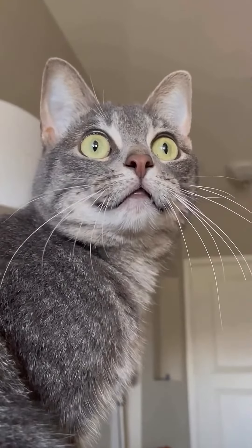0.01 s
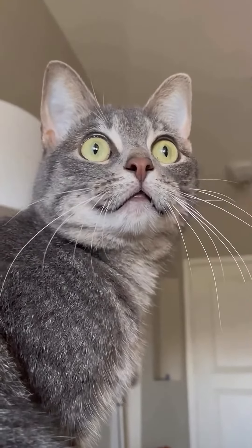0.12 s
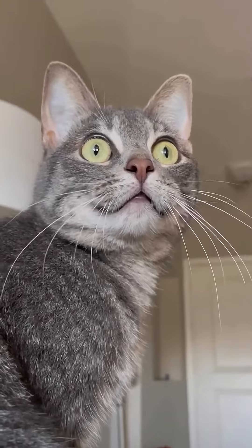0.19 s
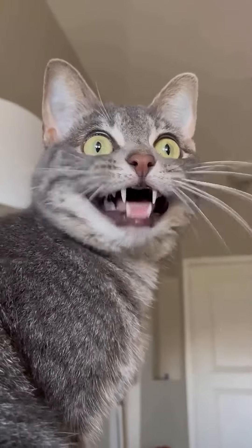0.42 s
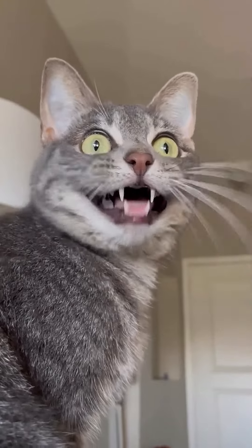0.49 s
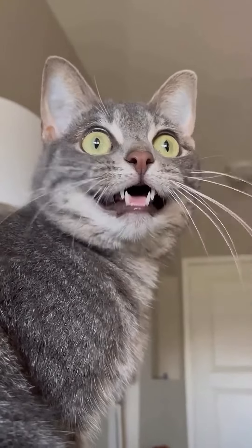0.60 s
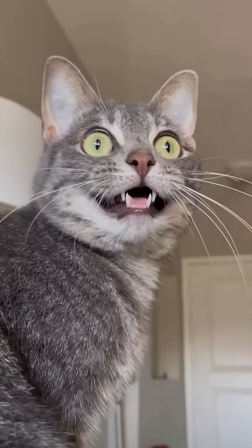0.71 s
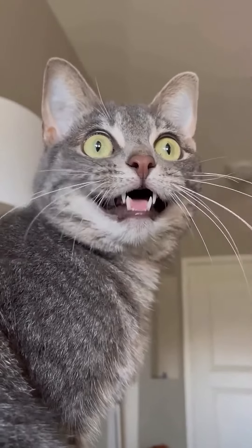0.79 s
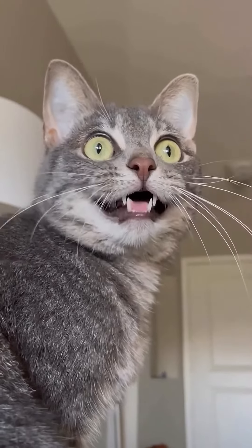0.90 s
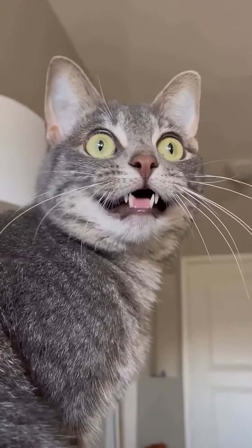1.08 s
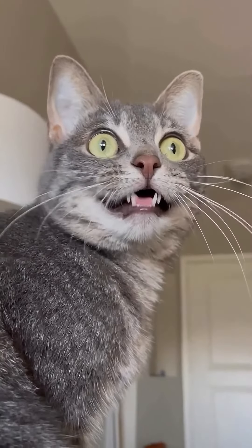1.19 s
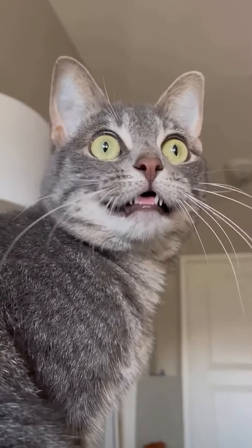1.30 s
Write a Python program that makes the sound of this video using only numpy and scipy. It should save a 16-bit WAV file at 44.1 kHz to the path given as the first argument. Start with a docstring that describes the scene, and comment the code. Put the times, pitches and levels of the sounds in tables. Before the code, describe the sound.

A cat chatters close to the microphone in a small room with low rumble, mains hum and faint hiss. At about 0.2 s it gives one clear, bright chirp under a tenth of a second long, with raspy breath and a blurred echo fading after. Faint lip ticks at 0.82-0.91 s lead to a sharp, voiceless jaw smack near 0.95 s, with wet hiss, tiny whistle and soft echo, then quieter room hum until 1.4 s.

```python
"""A low room rumble with a mains hum comes first, with faint hiss; it sinks unevenly under the cat.
Close to the microphone in a small room, the cat gives one short, clear chirp, a stack of overtones
shaped by throat and mouth, with raspy air and a low, blurred echo of filtered noise. Then come tiny lip
ticks and a voiceless smack of the jaw, coloured impulses with very bright edges, a wet hiss, a brief
whistle and a soft, blurred echo."""
import sys
import numpy as np
from scipy import signal
from scipy.fft import rfft, irfft, next_fast_len
from scipy.io import wavfile
from scipy.ndimage import map_coordinates

SR = 44100
rng = np.random.default_rng(int(sys.argv[2]) if len(sys.argv) > 2 else 0)


def dump_mix(stems):
    """Bounce the given channels to the path in sys.argv[1] as a 16-bit WAV at rate SR."""
    frames = np.atleast_2d(stems).T  # one column per channel
    limited = np.clip(frames, -1, 1)  # hard clip at full scale
    pcm = np.round(limited * 32767).astype(np.int16)
    wavfile.write(sys.argv[1], SR, pcm)


N = 61740  # samples, 1.4 s


def amp(db):
    """Decibels to gain."""
    return 10 ** (np.asarray(db) / 20)


def unit(x):
    """Scale to rms 1."""
    return x / np.sqrt(np.mean(x ** 2) + 1e-20)


def clock():
    """Time of each sample, in seconds."""
    return np.arange(N) / SR


def along(points, hz):
    """Read (f/Hz, value) points at hz, joined along a log frequency axis."""
    f, v = np.transpose(points)
    return np.interp(np.log(hz + 1), np.log(f + 1), v)


def curve(rows, outside=None):
    """(t/s, value) points joined by straight lines."""
    return np.interp(clock(), *np.transpose(rows), left=outside, right=outside)


def wobble(rate):
    """A smooth random curve, rate knots a second."""
    knots = rng.standard_normal(4096)
    return map_coordinates(knots, [clock() * rate], mode="wrap")


def coloured(x, points):
    """Causal minimum-phase filter with the given (f/Hz, level/dB) shape."""
    m = 2 * next_fast_len(N)
    gain = amp(along(points, np.fft.rfftfreq(m, 1 / SR)))
    cepstrum = irfft(np.log(gain), m)
    # folding the cepstrum onto positive time makes the filter causal
    cepstrum[1:m // 2] *= 2
    cepstrum[m // 2 + 1:] = 0
    return irfft(rfft(x, m) * np.exp(rfft(cepstrum)), m)[:N]


def noise(points):
    """Steady coloured noise of rms 1."""
    return unit(coloured(rng.standard_normal(N), points))


def rasp(colour):
    """Uneven, sputtering noise of rms 1: its level flickers before it is coloured."""
    flicker_db = 1 * wobble(330)
    return unit(coloured(rng.standard_normal(N) * amp(flicker_db), colour))


def decay(t, t60):
    """Gain that loses 60 dB in t60 seconds."""
    return np.exp(-np.log(1000) * np.maximum(t, 0) / t60)


def burst(s, db, rise, t60, colour):
    """Raspy noise that swells to a peak at s and dies away."""
    t = clock() - s
    swell = np.exp(-(np.minimum(t, 0) / rise) ** 2)
    return amp(db) * swell * decay(t, t60) * rasp(colour)


def snap(s, db, t60, colour, splash=0.206):
    """A sharp impulse with a brief noise splash, coloured and scaled to its peak."""
    t = (np.arange(N) - round(s * SR)) / SR
    impulse = t == 0
    spray = splash * (t > 0) * decay(t, t60) * rng.standard_normal(N)
    x = coloured(impulse + spray, colour)
    return amp(db) * x / np.abs(x).max()


def narrow(hz, width_hz):
    """A fuzzy tone of rms 1: two quadrature carriers with independent random levels."""
    turn = 2 * np.pi * hz * clock()
    return unit(wobble(width_hz) * np.sin(turn) + wobble(width_hz) * np.cos(turn))


def rumble_and_hum(waver_db=2, drift_rad=0.95):
    """Low noise and mains-hum sines, wavering in level and phase, under one common level curve."""
    # level of rumble and hum together: t/s, level/dB
    low_level = [(0, -45), (.07, -44), (.3, -44.5), (.45, -45), (.55, -45), (.63, -51.5), (.92, -50),
                 (1.08, -56.5), (1.4, -50.5)]
    # spectrum of the rumble: f/Hz, level/dB
    low_colour = [(12, -33.5), (25, -16), (50, -5), (80, -3.5), (125, -4.5), (170, -9.5), (220, -10),
                  (330, -20.5), (480, -24.5), (700, -48), (1500, -89.5)]
    # hum tones: f/Hz, mean level/dB against the common level curve
    hum_tones = [(59, -8.5), (120, -3.5)]
    hum = 0
    for hz, db in hum_tones:
        level = amp(db + waver_db * wobble(9.7))
        hum = hum + level * np.sin(2 * np.pi * hz * clock() + drift_rad * wobble(6))
    rumble = amp(-3.5) * noise(low_colour)
    return amp(curve(low_level)) * (rumble + hum)


def room_hiss():
    """Quiet noise in three layers: a steady floor, a changing middle and a high hiss that comes and goes."""
    # spectrum of the steady floor: f/Hz, level/dB
    floor_colour = [(200, -2.5), (600, -8), (1200, 0.5), (2500, -1.5), (5000, -2.5), (6700, -6.5),
                    (7250, -27), (9000, -22), (15000, -9.5)]
    # middle register: t/s, level/dB; then its spectrum: f/Hz, level/dB
    middle_level = [(0, -67), (.08, -81.5), (.14, -58), (.5, -61), (.75, -65.5), (1.4, -70)]
    middle_colour = [(150, -14.5), (300, 2), (500, -0.5), (800, -6.5), (1400, -9.5), (2500, -17),
                     (6000, -46)]
    # high hiss: t/s, level/dB; then its spectrum: f/Hz, level/dB
    high_level = [(0, -64.5), (.1, -61.5), (.19, -57.5), (.3, -50), (.5, -92.5)]
    high_colour = [(900, -30), (1700, -5.5), (2700, -24), (3700, -8), (4500, -22.5), (5500, -16.5),
                   (6300, -2), (7000, -8.5), (7700, -24), (9000, -67)]
    floor = amp(-64.5) * noise(floor_colour)
    middle = amp(curve(middle_level)) * noise(middle_colour)
    high = amp(curve(high_level)) * noise(high_colour)
    return floor + middle + high


def chirp(count=10):
    """A voiced note: overtones of a gliding pitch, shaped by the throat, brighter as the mouth opens."""
    # pitch: t/s, f/Hz
    pitch_track = [(.2101, 913), (.2166, 720), (.2243, 797), (.2275, 718), (.2435, 727), (.2475, 692),
                   (.253, 691), (.266, 720), (.2698, 812), (.2767, 776), (.2801, 937)]
    # vocal effort: t/s, level/dB
    effort = [(.205, -57), (.212, -30.5), (.217, -37.5), (.2195, -23.5), (.223, -14), (.242, -14.5),
              (.256, -24), (.272, -17.5), (.280, -18), (.285, -54)]
    # throat and mouth resonances: f/Hz, level/dB
    throat = [(700, 0), (1450, 0), (2170, 1.5), (2900, -7.5), (3550, -7.5), (4300, -16), (5050, -27.5),
              (5750, -18.5), (6350, -16.5), (7300, -23), (8200, -40)]
    # mouth opening: t/s, tilt/dB per octave above the fundamental
    opening = [(.208, -10.5), (.213, -2), (.222, -5), (.232, -0.5), (.243, 0), (.258, 2), (.265, -1.5),
               (.270, -3), (.276, -3), (.282, -23)]
    jitter, shimmer_db, flutter_rate = .002, 1.01, 300  # pitch share, overtone level, knots a second
    pitch = curve(pitch_track) * (1 + jitter * wobble(flutter_rate))
    phase = 2 * np.pi * np.cumsum(pitch) / SR
    voice = 0
    for k in range(1, count + 1):
        tilt_db = curve(opening) * np.log2(k)
        level_db = along(throat, k * pitch) + tilt_db + shimmer_db * wobble(flutter_rate)
        voice = voice + amp(level_db) * np.sin(k * phase + rng.uniform(0, 2 * np.pi))
    return amp(curve(effort, outside=-140)) * voice


def mouth_air():
    """Raspy noise of breath through the open mouth, during and after the chirp."""
    # breath: t/s, level/dB
    breath_level = [(.208, -53), (.224, -40.5), (.25, -35.5), (.275, -28), (.295, -31), (.31, -39.5),
                    (.335, -57.5), (.37, -71)]
    # spectrum of the breath: f/Hz, level/dB
    breath_colour = [(250, -30.5), (600, -7.5), (1200, -5), (1900, -10.5), (2500, -17), (3600, 2),
                     (4200, -4), (4800, -3), (5350, -9), (6200, 1), (7100, -2), (8200, -23), (9500, -35)]
    return amp(curve(breath_level, outside=-140)) * rasp(breath_colour)


def chirp_echo():
    """A low, blurred echo of the chirp from the room: a slow swell of noise, then a decay."""
    # spectrum of the echo: f/Hz, level/dB
    echo_colour = [(120, -13.5), (300, -12.5), (520, 1.5), (1150, -4), (1800, -15.5), (3100, -6.5),
                   (4500, -20.5), (8000, -38.5)]
    return burst(0.3168, -32, rise=0.048, t60=0.15, colour=echo_colour)


def room(x):
    """The small room's answer: a short diffuse tail that dies by band, and narrow, longer rings."""
    # spectrum of the tail: f/Hz, level/dB
    tail_colour = [(200, -1), (700, -8), (1400, -5), (2200, 1), (3200, 1), (4200, 1), (4800, -1.5),
                   (6300, 0.5), (8000, -7), (10000, -22.5)]
    # decay of the tail: f/Hz, t60/s
    tail_t60 = [(200, .3), (1000, 0.28), (3000, 0.23), (7000, .22)]
    # things in the room that ring along: f/Hz, width/Hz, t60/s, level/dB
    rings = [(744.6, 120, 0.29, -49.5), (2160, 200, 0.34, -39.5), (3650, 100, 0.3, -42)]
    hz, t, z = signal.stft(noise(tail_colour), SR, nperseg=256)
    z = z * decay(t, along(tail_t60, hz)[:, None])
    tail = signal.istft(z, SR, nperseg=256)[1][:N]
    tail = tail * (1 - np.exp(-(clock() / 0.004) ** 2))  # the tail builds up over about 4 ms
    parts = [(tail, -22)]
    for ring_hz, width_hz, t60, db in rings:
        parts.append((narrow(ring_hz, width_hz) * decay(clock(), t60), db))
    # each part is scaled by its energy before its level is set
    response = sum(amp(db) * part / np.linalg.norm(part) for part, db in parts)
    return signal.fftconvolve(x, response)[:N]


def lip_ticks():
    """Tiny, bright impulses from the lips."""
    # ticks: t/s, peak level/dB
    ticks = [(.818, -51), (.851, -45), (0.909, -43)]
    # spectrum of a tick: f/Hz, level/dB
    tick_colour = [(500, -26), (4000, -19), (5500, -5), (6400, 6), (7100, -9), (8000, -39)]
    return sum(snap(s, db, 0.0099, tick_colour) for s, db in ticks)


def jaw_smack():
    """Tongue and jaw clicks: sharp impulses, each with a short splash coloured by the mouth."""
    # clicks: t/s, peak level/dB, splash t60/s
    clicks = [(0.9343, -24, 0.013), (0.9373, -24, 0.0064), (0.9484, -10, 0.0084), (0.9507, -17, 0.0071)]
    # spectrum of a click: f/Hz, level/dB
    click_colour = [(120, -21.5), (400, -7), (750, -16.5), (1100, -2.5), (1600, -4), (1980, -7.5),
                    (2420, 2.5), (3100, -9), (4750, 1), (5400, -14), (6100, -3.5), (7200, -30.5),
                    (9000, -29)]
    return sum(snap(s, db, t60, click_colour) for s, db, t60 in clicks)


def treble_edges():
    """Very short, very bright clicks at the top of the band, along with the smack."""
    # edges: t/s, peak level/dB
    edges = [(.9528, -20), (.9575, -29), (.9688, -15)]
    # spectrum of an edge: f/Hz, level/dB
    edge_colour = [(2000, -24), (6500, -33), (8200, 7), (15000, -4.5)]
    return sum(snap(s, db, 0.0027, edge_colour) for s, db in edges)


def wet_hiss():
    """Raspy air past the teeth after the smack: a quick swell and a decay."""
    # spectrum of the hiss: f/Hz, level/dB
    hiss_colour = [(200, -9.5), (1100, -15.5), (1900, -14.5), (2500, -2.5), (3000, -13), (4300, 2),
                   (4800, -13), (5600, -3.5), (6300, 2), (6800, -4), (7300, -4.5), (8200, -24),
                   (15000, -27)]
    return burst(0.96, -31, rise=0.0097, t60=0.099, colour=hiss_colour)


def tooth_whistle():
    """Air whistling past the teeth: one brief sine whose pitch wanders quickly."""
    hz = 4790 + 140 * wobble(900)
    turn = 2 * np.pi * np.cumsum(hz) / SR
    swell = np.exp(-((clock() - .9635) / .0068) ** 2)
    return amp(-25.5) * swell * np.sin(turn)


def smack_echo():
    """A soft, low, blurred echo of the smack from the room: a swell of noise, then a decay."""
    # spectrum of the echo: f/Hz, level/dB
    echo_colour = [(90, -17), (200, 6), (550, -2), (1150, 3), (1900, -14.5), (3300, 3), (4500, -13.5),
                   (8000, -34)]
    return burst(0.99, -40.5, rise=0.04, t60=0.062, colour=echo_colour)


def scene():
    """The cat close by, the room's answer to it, and the background, in one channel."""
    background = rumble_and_hum() + room_hiss()
    call = chirp() + mouth_air() + chirp_echo()
    smack = jaw_smack() + treble_edges() + wet_hiss() + tooth_whistle() + smack_echo()
    cat = call + lip_ticks() + smack
    return (cat + room(cat) + background)[None]


def record(dry):
    """The microphone drops steeply in the high treble and keeps nothing above its band limit."""
    # microphone response: f/Hz, level/dB
    mic_response = [(6900, 1), (7500, -6.5), (8200, -13.5), (15000, -27)]
    top_hz = 15800
    m = 2 * next_fast_len(N)
    hz = np.fft.rfftfreq(m, 1 / SR)
    gain = amp(along(mic_response, hz)) * (hz < top_hz)
    return irfft(rfft(dry, m) * gain, m)[:, :N]


dry = scene()
out = record(dry)
dump_mix(out)
```